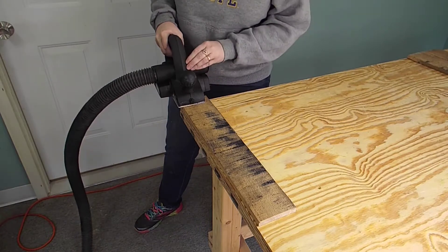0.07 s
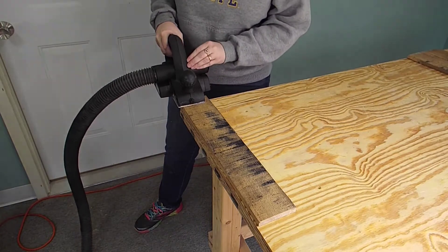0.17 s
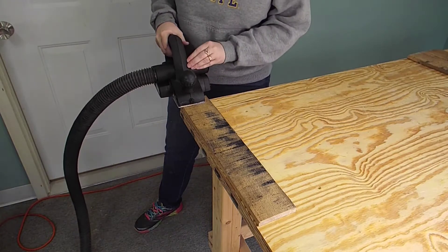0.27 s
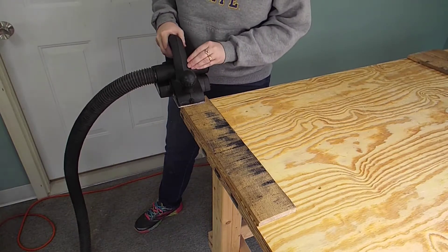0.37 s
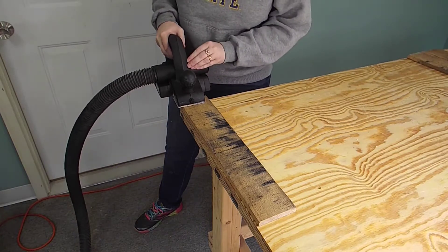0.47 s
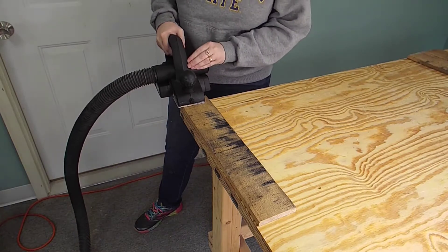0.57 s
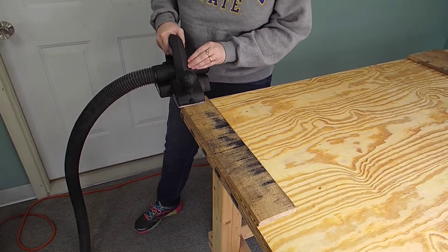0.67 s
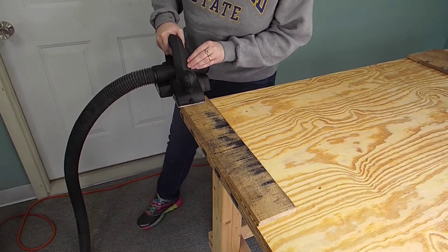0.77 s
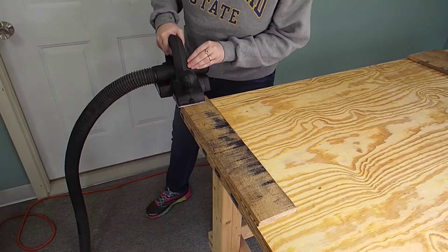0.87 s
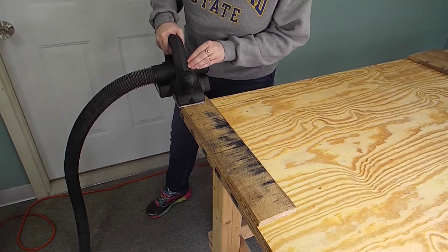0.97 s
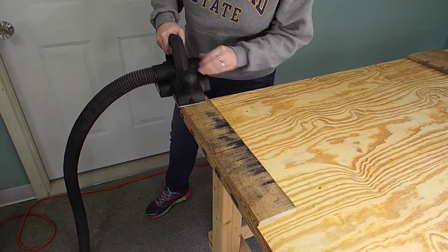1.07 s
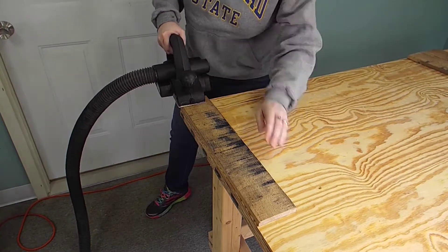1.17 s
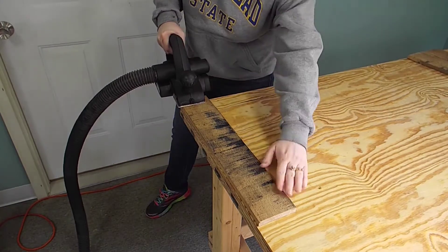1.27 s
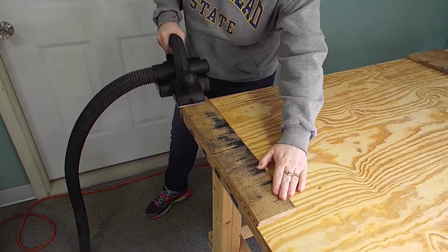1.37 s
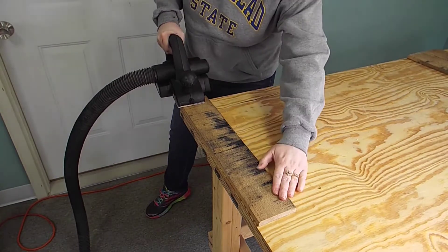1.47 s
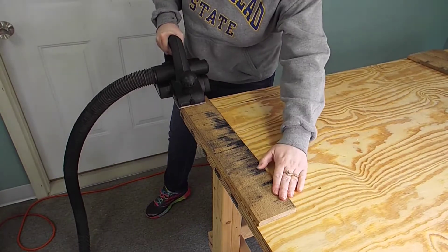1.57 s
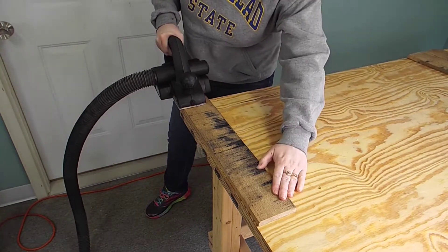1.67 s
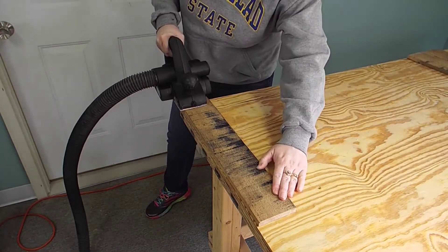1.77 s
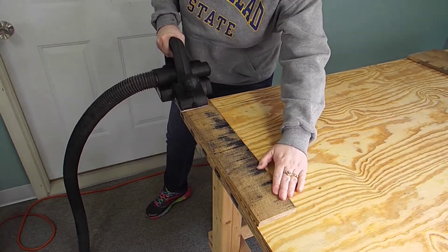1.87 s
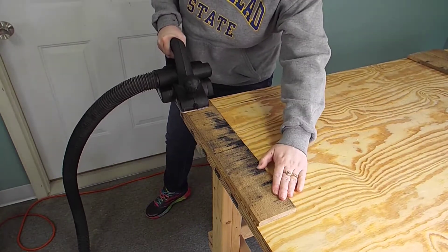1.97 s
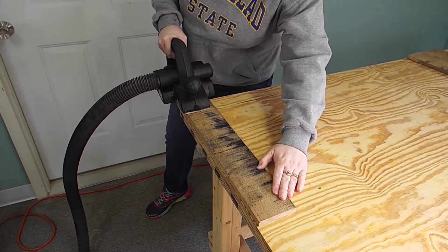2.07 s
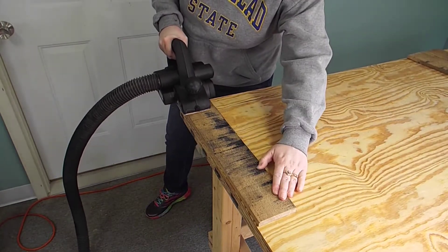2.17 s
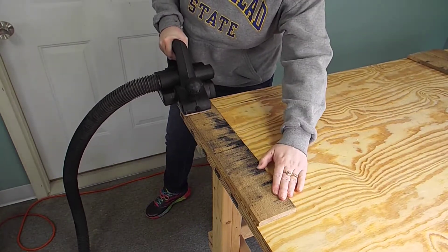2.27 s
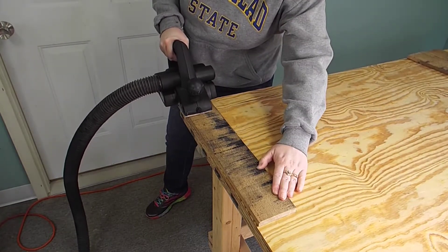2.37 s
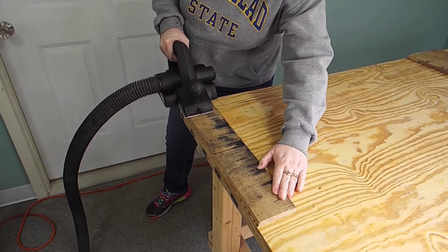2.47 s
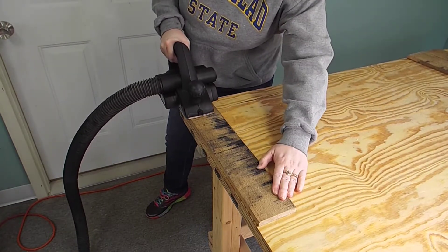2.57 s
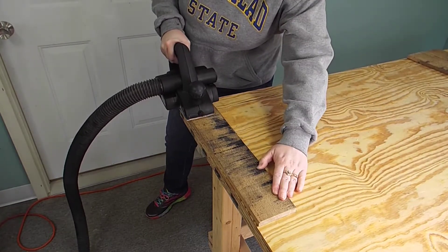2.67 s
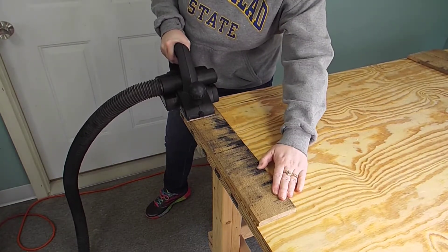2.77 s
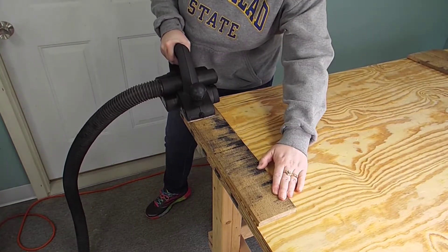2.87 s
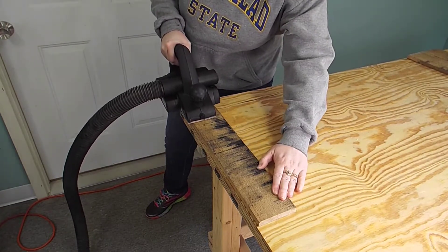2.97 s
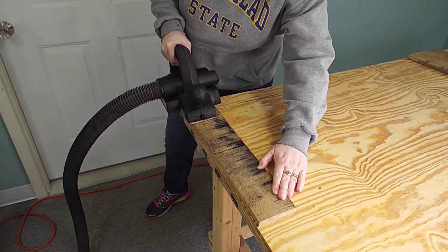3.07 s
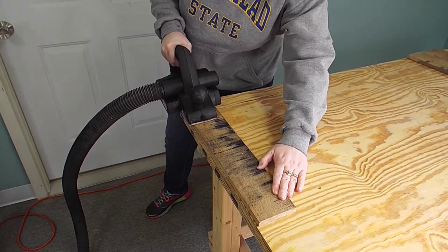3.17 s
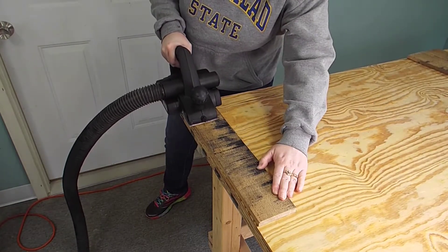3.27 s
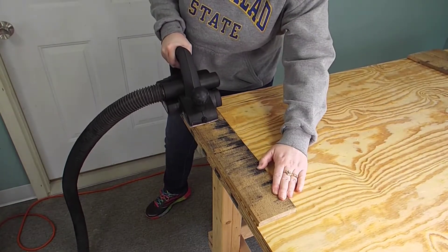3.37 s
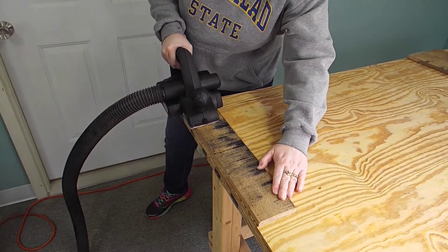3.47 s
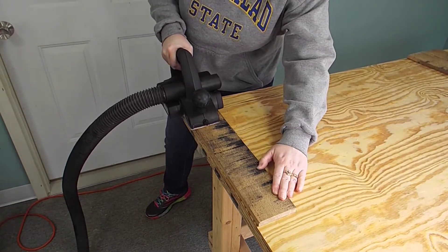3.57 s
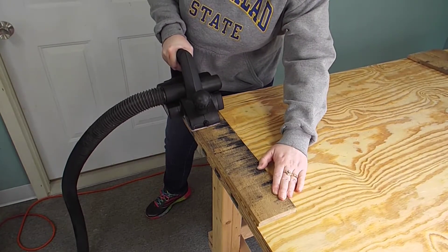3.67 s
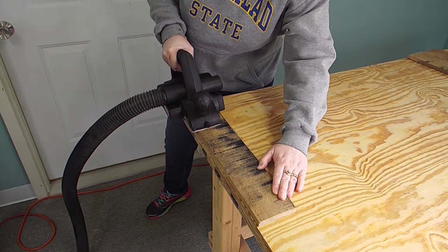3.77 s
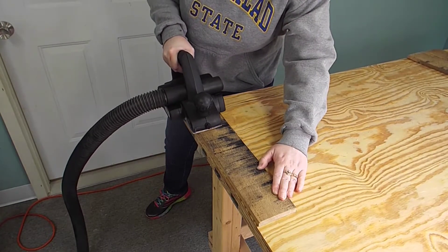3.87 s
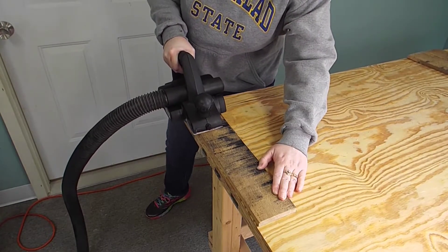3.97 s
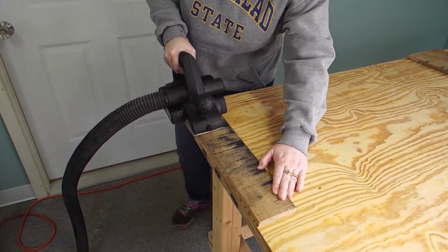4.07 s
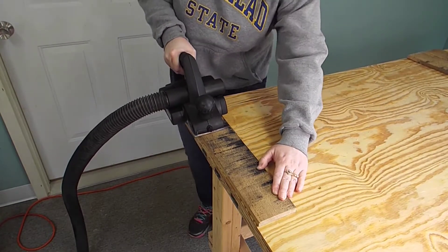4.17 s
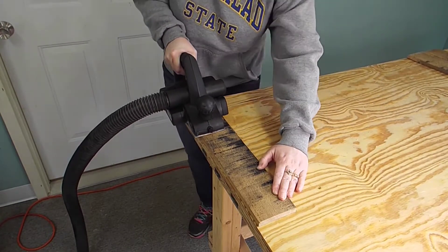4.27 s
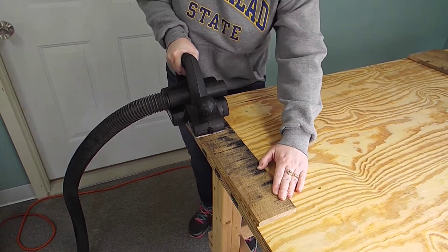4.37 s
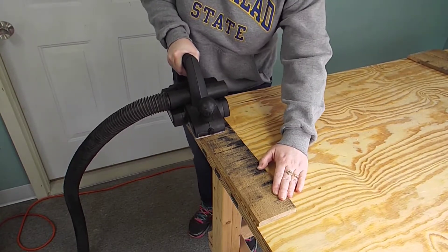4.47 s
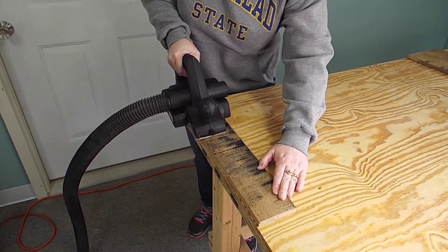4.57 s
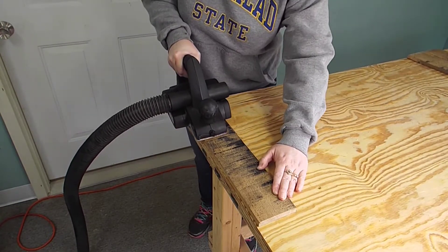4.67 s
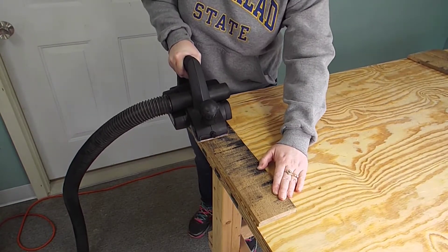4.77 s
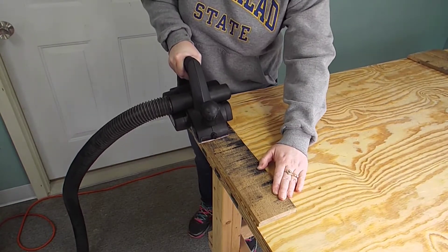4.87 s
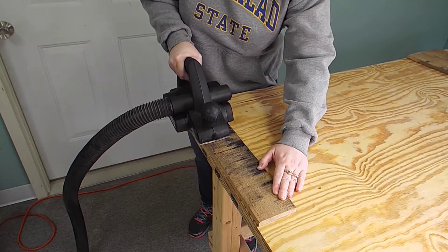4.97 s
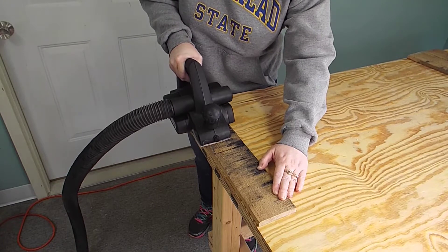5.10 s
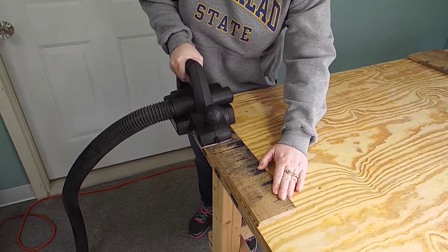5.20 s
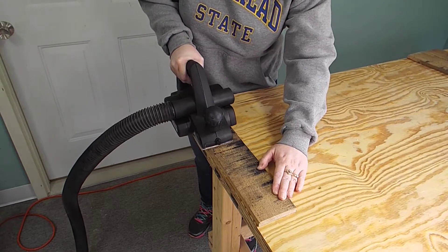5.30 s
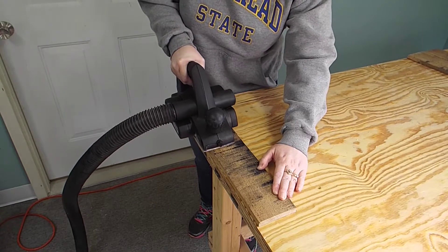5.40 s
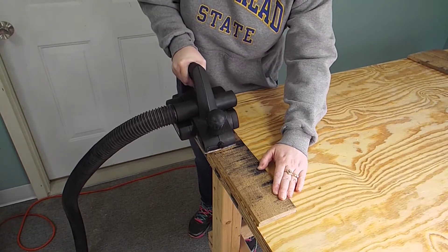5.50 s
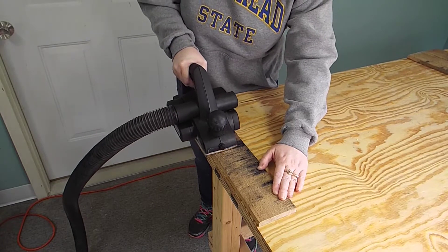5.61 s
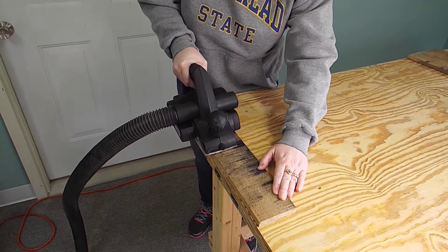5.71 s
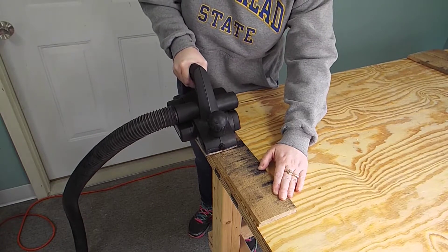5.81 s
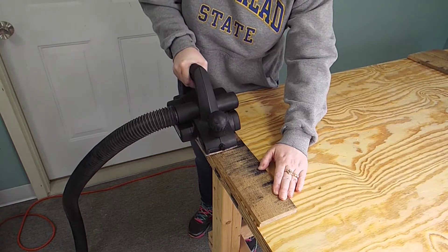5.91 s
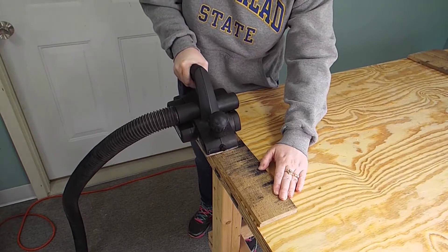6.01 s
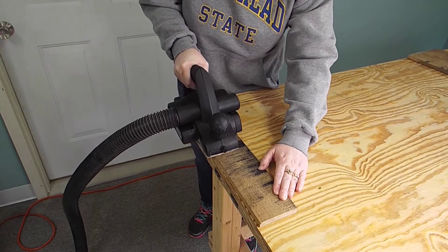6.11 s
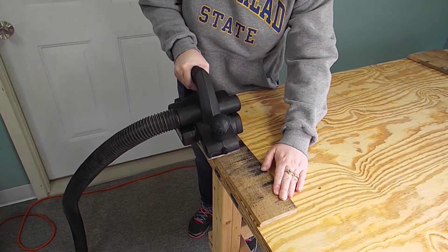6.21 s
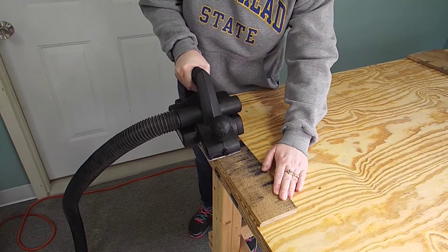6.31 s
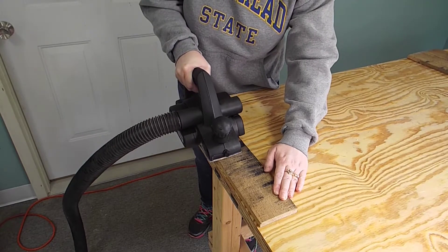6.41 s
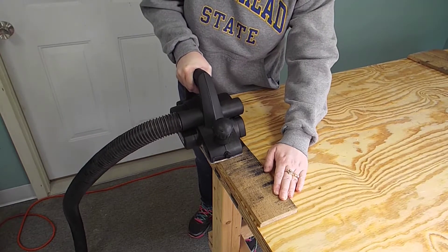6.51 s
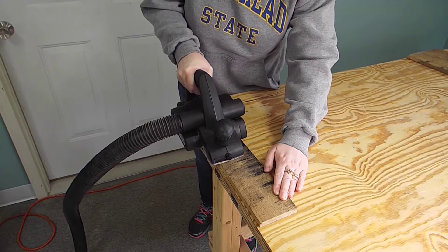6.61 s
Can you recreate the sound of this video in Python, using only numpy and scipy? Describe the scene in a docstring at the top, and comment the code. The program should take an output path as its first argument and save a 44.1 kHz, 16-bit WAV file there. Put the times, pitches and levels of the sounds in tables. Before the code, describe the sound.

A shop vacuum clicks on and rushes, then an electric hand planer whines up and shaves a wooden board in a small workshop.

```python
"""Hand planer and shop vacuum in a small workshop

A shop vacuum is switched on, then an electric hand planer runs up and shaves a board. The two-blade
drum whines in a harmonic stack, the belt-linked motor adds its own lines, and air rushes through hose
and housing. Heard on a stereo pair in the same room: reflections off the walls make every line waver
and differ between the two microphones."""
import sys
import numpy as np
from scipy import signal
from scipy.fft import rfft, irfft
from scipy.io import wavfile

SR = 44100
rng = np.random.default_rng(int(sys.argv[2]) if len(sys.argv) > 2 else 0)


def wav_record(signal):
    """Record a signal, one row per channel, as 16-bit PCM in the file named by sys.argv[1]."""
    frames = np.transpose(np.atleast_2d(signal))
    bounded = np.clip(frames, -1, 1)
    # unit amplitude maps onto the largest positive 16-bit level
    quanta = np.round(bounded * 32767).astype(np.int16)
    wavfile.write(sys.argv[1], SR, quanta)


N = 293265
T = np.arange(N) / SR
PLANER_ON_S = 1.2

# The planer's run-up and sag in the cut. Each row: time in seconds, blade passes per second.
DRUM_SPEED = [(1.2, 315), (1.26, 372), (1.32, 411), (1.38, 438), (1.44, 456), (1.5, 467.3), (1.7, 487.8),
              (1.9, 495.2), (2.2, 500.3), (2.7, 503.6), (3.2, 499.8), (3.6, 495.3), (3.8, 496.5),
              (4.0, 502.7), (4.4, 505.6), (5.4, 507.2), (5.6, 504.6), (5.8, 503.0), (6.0, 507.1),
              (6.3, 510.3), (6.65, 512.5)]
def drum_passes():
    """Blade passes counted so far, two per drum turn; every planer line is locked to them."""
    return np.cumsum(in_time(DRUM_SPEED)[0]) / SR


# The whine at the microphones, harmonics 1 to 9. Each entry: base level in dB, mid and then side.
BLADE_MID_DB = [-46, -45.5, -41, -43, -42, -45, -42.5, -44, -49]
BLADE_SIDE_DB = [-45.5, -42, -36.5, -44, -38, -38, -57, -44, -57]
# One list of swells per harmonic. Each row: centre in seconds, half length in seconds, level in dB.
BLADE_SWELLS = [
    [(1.4, 0.074, -45.5), (1.58, 0.041, -33.5), (1.7, 0.036, -35.5), (2.08, 0.32, -28), (2.32, 0.11, -36.5),
     (2.95, 0.35, -31.5), (3.4, 0.28, -40), (3.95, .1, -46), (5.68, 0.27, -42), (6.45, 0.24, -41)],
    [(1.45, 0.022, -29), (1.98, 0.2, -31), (2.46, .25, -29.5), (4.4, 0.5, -36.5), (5.25, 0.27, -36.5),
     (6.4, 0.27, -43)],
    [(1.26, 0.12, -36), (1.38, 0.012, -29), (1.45, 0.013, -26), (1.59, 0.054, -27.5), (1.69, .04, -27.5),
     (1.87, 0.065, -27.5), (2.85, 0.52, -40.5), (3.44, 0.089, -41.5), (4.78, 0.32, -31), (5.47, 0.3, -29.5),
     (5.96, 0.036, -38), (6.5, 0.16, -30)],
    [(2.02, 0.41, -33), (2.95, 0.2, -40), (4.0, .1, -41), (5.68, 0.3, -46), (6.1, 0.094, -49),
     (6.42, 0.15, -48)],
    [(2.68, 0.22, -30), (3.1, 0.14, -39), (3.72, 0.053, -43), (4.18, .17, -37.5), (4.56, 0.091, -30.5),
     (4.86, .08, -32.5), (5.15, 0.27, -37.5), (5.6, 0.29, -38.5), (6.3, 0.33, -43)],
    [(2.55, 0.29, -41), (3.44, 0.12, -37), (3.72, 0.055, -30.5), (4.0, 0.089, -35.5), (4.28, 0.13, -34),
     (4.65, 0.26, -38), (6.2, 0.083, -32.5), (6.52, 0.2, -36)],
    [(2.2, 0.12, -45), (2.82, 0.1, -36.5), (3.68, 0.16, -44), (5.47, 0.23, -48), (5.87, 0.047, -40)],
    [(1.21, 0.032, -34), (2.9, 0.091, -47), (3.63, 0.18, -36.5), (4.14, 0.092, -38), (4.9, 0.2, -41),
     (5.32, 0.17, -32.5), (6.2, 0.061, -38.5)],
    [(3.0, .1, -46), (3.65, 0.091, -37), (4.75, 0.3, -35.5)],
]
def blade_whine(passes):
    """Harmonics of the blade rate, swelling now in one, now in another."""
    out = 0
    for k, (mid_db, side_db, swells) in enumerate(zip(BLADE_MID_DB, BLADE_SIDE_DB, BLADE_SWELLS), 1):
        late_db = -2.0 * max(k - 3, 0) * np.clip(3.2 - T, 0, 1)   # upper ones fill the room in the cut
        onset_db = -1.7 * k * np.clip(2.0 - T, 0, 1)
        waver_db = 2.5 * drift(3.7)
        base = from_db(mid_db + 0.53 * late_db + onset_db + waver_db)
        swell = bumps([(s, half, from_db(db)) for s, half, db in swells])
        reflected_db = side_db + .5 * run_up_db() + late_db
        out += line(k * passes, 20 * np.log10(base + swell), reflected_db, waver_db=0.78)
    return out


# How hard the blades bite the board. Each row: time in seconds, gain in dB.
BITE = [(1.2, -12), (1.75, -2), (2.0, -2), (3.0, 3.5), (3.9, 3), (5.3, 4.5), (5.75, 6), (6.3, -17),
        (6.65, -11)]
# The top of the whine. Each row: multiple of the blade rate, base level in dB.
BITE_LINES = [(10, -46), (11, -47.5), (12, -44.5), (13, -48.5), (14, -41.5), (15, -46), (16, -46),
              (17, -69)]
def blade_bite(passes):
    """High harmonics that grow as the blades bite into the wood."""
    gain_db = in_time(BITE)[0] + run_up_db()
    return sum(line(k * passes, db + gain_db, db + gain_db - 3, waver_db=3) for k, db in BITE_LINES)


def run_up_db():
    """Gain that builds over half a second as the drum runs up."""
    return 20 * np.log10(np.clip((T - 1.17) / .5, 1e-4, 1))


# Load on the drum. Each row: time in seconds, gain of the unequal bite in dB, belt beat level in dB.
LOAD = [(1.2, -13, -62), (2.6, -4, -59), (3.2, 1.5, -31), (3.6, 0, -32.5), (4.1, -3, -42), (4.45, 4.5, -43),
        (5.4, -10, -46), (5.55, 7.5, -42), (5.8, 6.5, -36), (5.95, -11, -43), (6.65, -8, -51)]
# Lines midway between the harmonics. Each row: multiple of the blade rate, base level in dB.
HALF_LINES = [(2.5, -54), (3.5, -48), (4.5, -45), (5.5, -52), (6.5, -47), (7.5, -47), (8.5, -55),
              (9.5, -53), (10.5, -55), (12.5, -52)]
# Belt beats. Each row: blade multiple from which the motor rate is subtracted, relative level in dB.
BELT_LINES = [(7, -3.5), (5, -10), (8, -11), (11, -32)]
MOTOR_TURNS_PER_PASS = .8312   # set by the belt
def drum_load(passes):
    """Two blades biting unequally repeat once a turn; the belt makes drum and motor beat."""
    uneven_db, belt_db = in_time(LOAD)
    out = 0
    for k, db in HALF_LINES:
        out += line(k * passes, db + uneven_db, db + uneven_db + 2, waver_db=2.5)
    for k, db in BELT_LINES:
        out += line((k - MOTOR_TURNS_PER_PASS) * passes, db + belt_db, db + belt_db - 8, waver_db=2.5)
    return out


# The planer's motor. Each row: multiple of its turning rate (35 is the commutator), base level in dB.
MOTOR_LINES = [(1, -46), (2, -53.5), (3, -48), (35, -50)]
def planer_motor(passes):
    """The motor's own lines, which come clear as its speed settles."""
    settling_db = -12 * np.clip(2.2 - T, 0, 1)
    out = 0
    for k, db in MOTOR_LINES:
        mid_db = db + settling_db
        out += line(k * MOTOR_TURNS_PER_PASS * passes, mid_db, mid_db - 6 - k / 2,
                    waver_db=2.5 + k / 18, blur_rad=0.21 + k / 30, blur_hz=5 + 0.98 * k)
    return out


# The vacuum, in the same room. Each row: time in seconds, motor turns per second.
VACUUM_SPEED = [(.4, 290), (.55, 345), (.7, 363), (1, 368), (1.4, 369.3), (2, 370.4), (3, 372), (4, 372.7),
                (6.65, 373)]
# Each row: time in seconds, gain of the lowest line in dB (line k takes 1/k of it).
VACUUM_GAIN = [(.4, -3), (.55, 6.5), (.7, 9.5), (1, 6), (1.15, -5), (1.4, -1.5), (1.75, 1), (3, -3), (4, 1),
               (5.3, 1), (6.65, 0.5)]
# Each row: multiple of the turning rate, base level in dB.
VACUUM_LINES = [(1, -47), (3, -41), (4, -45.5), (5, -52.5), (6, -45), (7, -46)]
def vacuum_motor():
    """The lines of the vacuum's rotor, the upper ones blurred by its unsteady speed."""
    turns = np.cumsum(in_time(VACUUM_SPEED)[0]) / SR
    gain_db, = in_time(VACUUM_GAIN)
    out = 0
    for k, db in VACUUM_LINES:
        mid_db = db + gain_db / k
        out += line(k * turns, mid_db, mid_db - 6.5, waver_db=2, blur_rad=0.28 * k)
    return out * (T > .4)


# Air at the microphones. Each row: time in seconds, hiss level in dB, hose and wind offsets in dB.
FLOW = [(.3, -98, 5, -5), (.35, -53.5, 5.5, -5), (.39, -38, 7.5, -5), (.42, -36.5, 3.5, -5),
        (.47, -27.5, 2.5, -5), (1.2, -26.5, 2, 1), (1.45, -28, 3.5, 3), (1.53, -26.5, -2, -4),
        (1.58, -27, 0, -4.5), (1.72, -28, 5, -5.5), (2.2, -25, 2.5, -7.5), (2.55, -26, 1.5, -5),
        (2.97, -23.5, 0.5, -5.5), (3.75, -25.5, 2.5, -4.5), (3.95, -25, 4, -5), (5.05, -24, 1, -5),
        (5.6, -26, -0.5, -3.5), (6.2, -24, 4, -5), (6.65, -25, 4, -5)]
# Colours of hose rush, planer wind and bright hiss. Each row: frequency in Hz, relative density in dB.
HOSE_SPECTRUM = [(35, -88), (60, -62), (226, -13.5), (400, -8), (514, -15.5), (614, -3.5), (774, -8),
                 (950, -4), (1180, 3), (1350, 0), (1600, -1.5), (2000, -6), (3260, -5.5), (5200, -7),
                 (6760, -7.5), (11400, -120)]
WIND_SPECTRUM = [(35, -85), (60, -57), (297, -36.5), (396, -21), (454, -13.5), (500, -4.5), (572, -9),
                 (1410, -6), (1500, -7.5), (1850, -3), (6000, -4), (7800, -64), (13200, -120)]
HISS_SPECTRUM = [(2940, -71), (5000, -14), (5300, -26.5), (6580, 0), (7790, 1), (12200, -19),
                 (15000, -25.5), (15300, -23), (15800, -43)]
# Moments when the rush draws to the centre of the pair.
# Each row: centre in seconds, half length in seconds, loss of width in dB, swell of the hose in dB.
GATHERS = [(0.449, 0.058, 13, 3.5), (1.585, 0.041, 8, 6), (4.59, 0.061, 11, 2), (5.215, 0.052, 12, 3),
           (5.436, 0.064, 13, 1.5), (6.426, .07, 8, 1)]
PUFF_DEPTH, WIND_SWELL_SHARE = .12, 0.72
def rushing_air(passes):
    """Air through hose and housing; each blade pass puffs the wind and the hiss."""
    hiss_db, hose_db, wind_db = in_time(FLOW)
    swell_db = bumps([(s, half, db) for s, half, _, db in GATHERS])
    puff = 1 + PUFF_DEPTH * np.sin(2 * np.pi * passes) * (T > 1.3)
    arrival = np.clip((T - PLANER_ON_S) / .5, 0, 1)   # the planer's wind comes in, the hose recedes
    hose_gain = from_db(hiss_db + hose_db + swell_db - 10.33 * arrival)
    wind_gain = from_db(hiss_db + wind_db + WIND_SWELL_SHARE * swell_db) * arrival
    hose = hose_gain * air_noise(HOSE_SPECTRUM, flicker_db=.4)
    wind = wind_gain * air_noise(WIND_SPECTRUM, flicker_db=.4)
    hiss = from_db(hiss_db) * air_noise(HISS_SPECTRUM, flicker_db=1.0)
    return (hose + puff * (wind + hiss)) * (T > .3)


# The vacuum's switch, left of centre. Each row: start in seconds, relative level in dB.
SWITCH_BOUNCES = [(.384, -15), (.3857, -9.5), (.389, -14)]
# Its ring. Each row: frequency in Hz, relative level in dB, time to fall 60 dB in seconds.
SWITCH_MODES = [(715, 1, 0.013), (1900, -21, .012), (3100, 1, .012), (3600, 3, 0.0081), (5100, 4.5, 0.0087),
                (8000, 5.5, 0.0048), (12000, -10, .004)]
def vacuum_switch():
    """A plastic switch snaps, bounces and rings briefly."""
    clicks, ring = np.full(N, 1e-18), 0
    for s, db in SWITCH_BOUNCES:
        clicks[round(s * SR)] = from_db(db - 14.0)
    for hz, db, t60 in SWITCH_MODES:
        r, w = from_db(-60 / (t60 * SR)), 2 * np.pi * hz / SR
        ring += signal.lfilter([0, from_db(db) * np.sin(w)], [1, -2 * r * np.cos(w), r * r], clicks)
    no_bass = signal.butter(2, 500, "high", fs=SR, output="sos")   # too small a body for bass
    return signal.sosfilt(no_bass, ring) * from_db([[0], [-4]])


# Faint tones over a hush at the opening. Each row: time in seconds, overall level in dB.
OPENING_LEVEL = [(0, -59), (.16, -56), (.18, -67), (.245, -70), (.26, -100), (.33, -100)]
# The tones and the hush. Each row: frequency in Hz, relative level in dB.
OPENING_TONES = [(236.9, -71), (834.4, -71), (1432, -73), (2073, -75)]
OPENING_HUSH = [(35, -49), (60, -26), (194, -48), (242, 4.5), (271, -20), (821, -35), (1000, -26),
                (12000, -33), (15600, -82), (22000, -120)]
def opening_tones():
    """Faint wavering tones over a hush, gone just before the switch snaps."""
    tones = sum(line(hz * T, db, db - 2, waver_db=11.8) for hz, db in OPENING_TONES)
    blend = 0.56 * tones / tones.std() + 0.37 * air_noise(OPENING_HUSH)
    return from_db(in_time(OPENING_LEVEL)[0]) * blend * (T < .33)


# A buzz far under the machines, coming and going. Each row: time in seconds, gain in dB.
BUZZ_FADES = [(.3, 3), (.6, 1), (1.0, -10), (1.4, 0), (2.6, 6), (2.85, -14), (4.6, 2.5), (5.2, -16),
              (6.25, -15), (6.65, 4)]
BUZZ_HZ = 120
def mains_buzz():
    """A tone at twice the supply frequency that swells with the planer's starting current."""
    running = from_db(-73.5 + in_time(BUZZ_FADES)[0]) * (T > .38)
    inrush = bumps([(1.17, 0.046, from_db(-51))])
    return (running + inrush) * line(BUZZ_HZ * T, 3.2, -21, waver_db=1.2)


REFLECTION_WAVER_DB = 4
def line(cycles, mid_db, side_db, waver_db, blur_rad=0.43, blur_hz=6):
    """One tone as mid and side; the side is sound off the walls, wandering in strength and phase."""
    phase = 2 * np.pi * (cycles + rng.random()) + blur_rad * drift(blur_hz)
    mid = from_db(mid_db + waver_db * drift(7.8)) * np.sin(phase)
    side_gain = from_db(side_db + REFLECTION_WAVER_DB * drift(1.2))
    side = side_gain * np.sin(phase + 1.87 * drift(0.64) + 6 * rng.random())
    return np.sqrt(2) * np.array([mid, side])


# Spread of the noise across the pair. Each row: frequency in Hz, side minus mid in dB.
NOISE_WIDTH = [(60, -4), (110, -8), (200, -7.5), (380, -3), (700, -5.5), (1290, -3.5), (2380, -1.5),
               (4400, 1.5), (8120, -6), (15000, -9.5)]
def air_noise(spectrum, flicker_db=0.0):
    """Mid and side noise of one colour, two sets of bands flickering apart; mid rms 1."""
    hz = np.fft.rfftfreq(N, 1 / SR) + 1
    mid_db = at_hz(spectrum, hz)
    coloured = rfft(rng.standard_normal((2, N))) * from_db([mid_db, mid_db + at_hz(NOISE_WIDTH, hz)])
    comb = np.cos(np.pi * np.log2(hz)) ** 2   # one tooth per octave
    out = sum(irfft(coloured * part, N) * from_db(flicker_db * drift(6.4)) for part in (comb, 1 - comb))
    return out / out[0].std()


def drift(rate_hz):
    """Slow random wander with a spread of 1."""
    r = np.exp(-128 * np.pi * rate_hz / SR)
    slow = signal.lfilter([1], [1, -2 * r, r * r], rng.standard_normal(N // 64 + 1502))[1500:]
    return np.interp(np.arange(N) / 64, np.arange(len(slow)), slow / slow.std())


def bumps(rows):
    """Sum of rounded rises and falls. Each row: centre and half length in seconds, height."""
    coarse = T[::64]
    heights = sum(h * np.exp(-np.abs((coarse - s) / half) ** 3) for s, half, h in rows)
    return np.interp(T, coarse, heights)


def from_db(db):
    """Decibels to gain."""
    return 10 ** (np.asarray(db) / 20)


def in_time(rows):
    """Columns of a curve table, one value per sample."""
    s, *columns = np.transpose(rows)
    return [np.interp(T, s, c) for c in columns]


def at_hz(points, hz):
    """Read a spectrum table on a log-frequency axis."""
    table_hz, db = np.transpose(points)
    return np.interp(np.log(hz), np.log(table_hz), db)


def low_part(x, edge_hz, order=2):
    """What lies below an edge, without delay."""
    return signal.sosfiltfilt(signal.butter(order, edge_hz, fs=SR, output="sos"), x)


# The treble draws to the centre from 1.2 s on. Each row: time in seconds, share of side lost.
TREBLE_CENTRING = [(1.2, 0), (1.6, .75), (6.65, .75)]
USUAL_WIDTH_DB, NARROW_BELOW_HZ, CENTRE_ABOVE_HZ = 3, 2100, 6500
def scene():
    """All sources as mid and side, turned into left and right; the lower image narrows now and then."""
    passes = drum_passes()
    planer = blade_whine(passes) + blade_bite(passes) + drum_load(passes) + planer_motor(passes)
    rush = rushing_air(passes)
    machines = planer * (T > PLANER_ON_S) + vacuum_motor() + rush + vacuum_switch()
    mid, side = machines + opening_tones() + mains_buzz()
    width = from_db(USUAL_WIDTH_DB - bumps([(s, half, db) for s, half, db, _ in GATHERS]))
    gathered = np.sqrt(np.clip(2 - width ** 2, .5, 2)) - 1   # power leaving the sides goes to the middle
    mid = mid + 0.61 * gathered * low_part(rush[0], NARROW_BELOW_HZ)
    side = side + (width - 1) * low_part(side, NARROW_BELOW_HZ)
    side_treble = side - low_part(side, CENTRE_ABOVE_HZ, order=8)
    side = side - in_time(TREBLE_CENTRING)[0] * side_treble
    return np.array([mid + side, mid - side])


LOW_CUT_HZ, TOP_CUT_HZ = 143, 16000
def record(dry):
    """The microphones lose the deep bass; the top is cut."""
    thin = signal.sosfilt(signal.butter(2, LOW_CUT_HZ, "high", fs=SR, output="sos"), dry)
    return signal.sosfilt(signal.cheby2(12, 70, TOP_CUT_HZ, fs=SR, output="sos"), thin)


dry = scene()
out = record(dry)
wav_record(out)
```